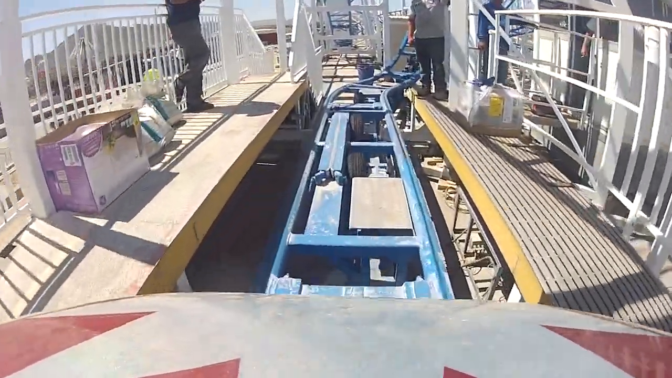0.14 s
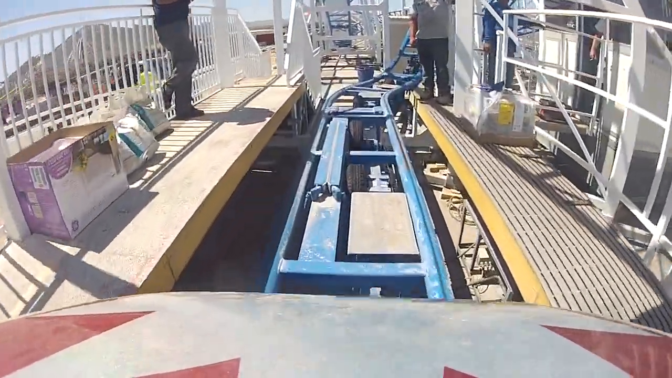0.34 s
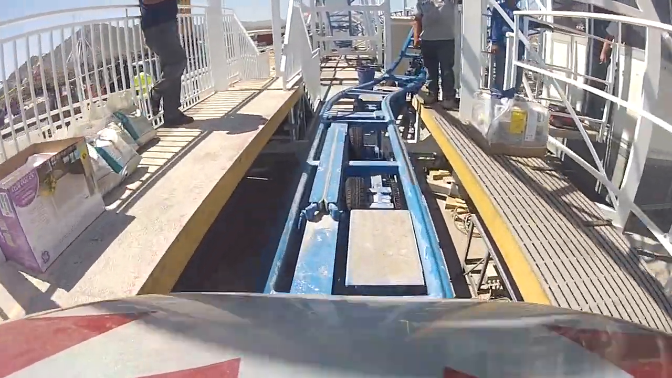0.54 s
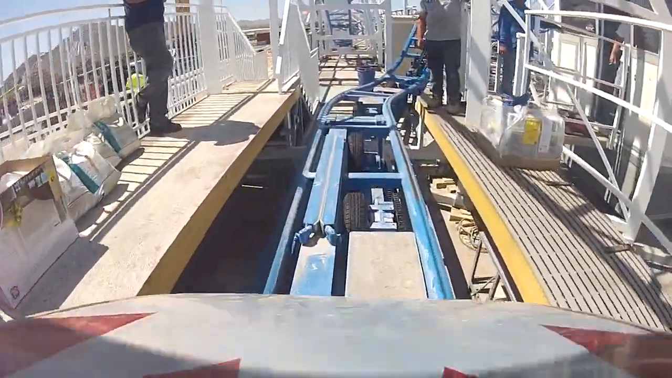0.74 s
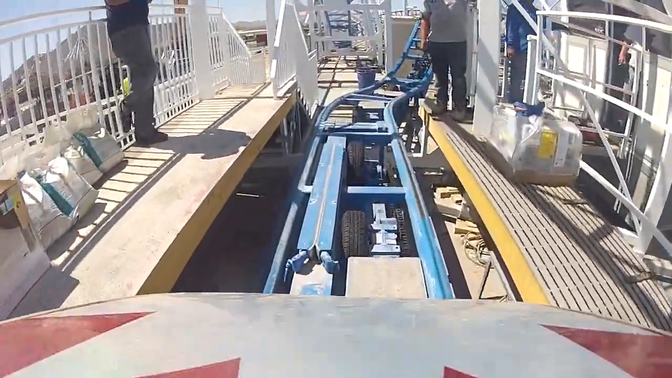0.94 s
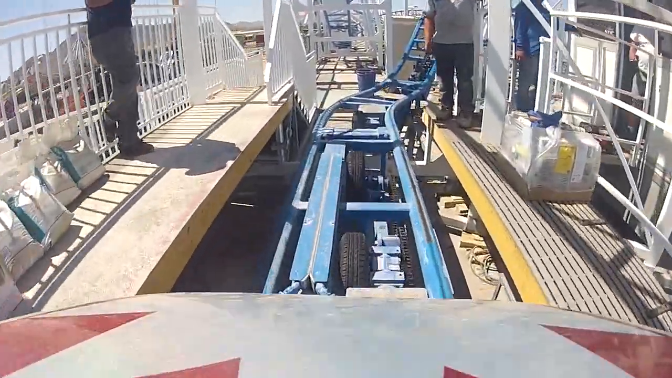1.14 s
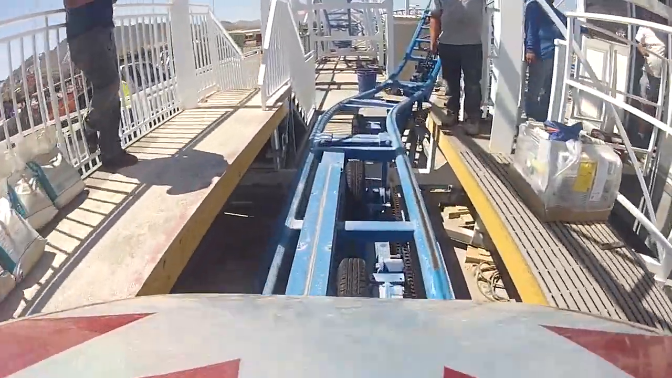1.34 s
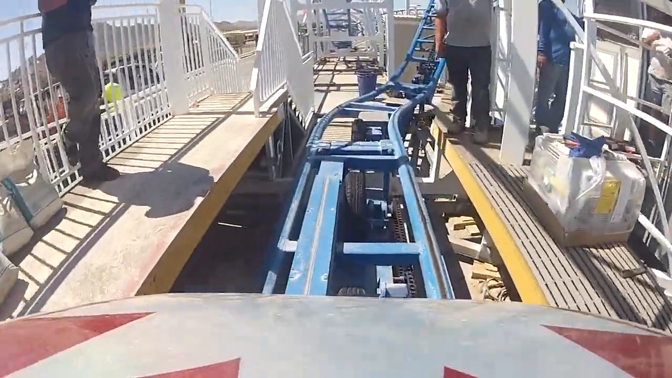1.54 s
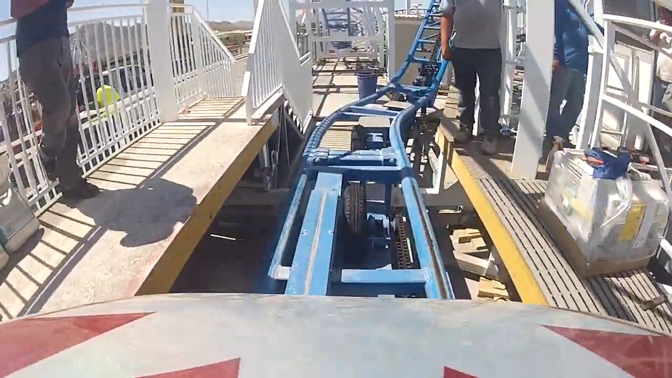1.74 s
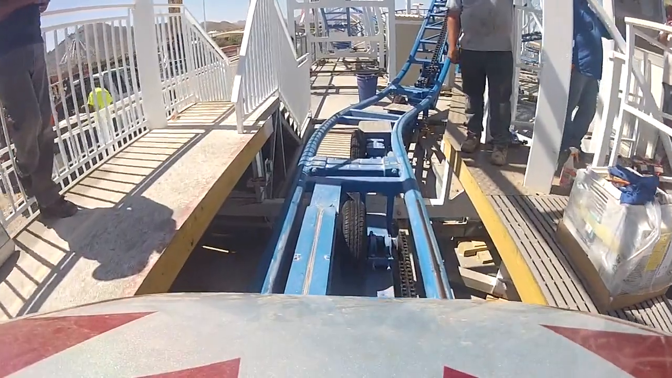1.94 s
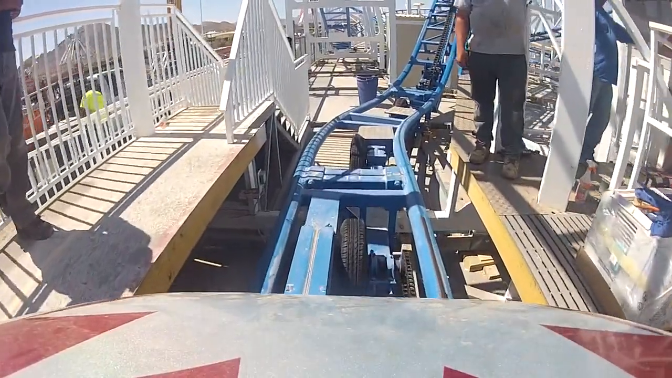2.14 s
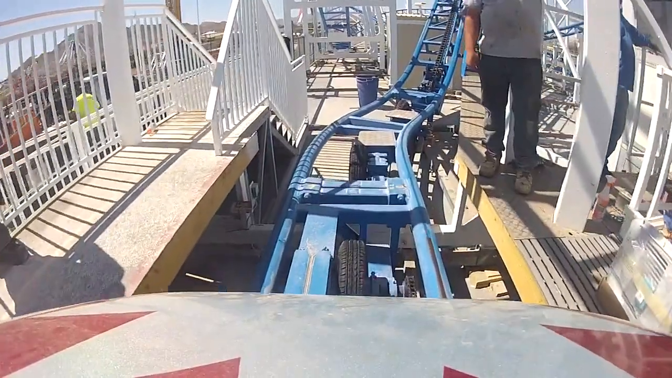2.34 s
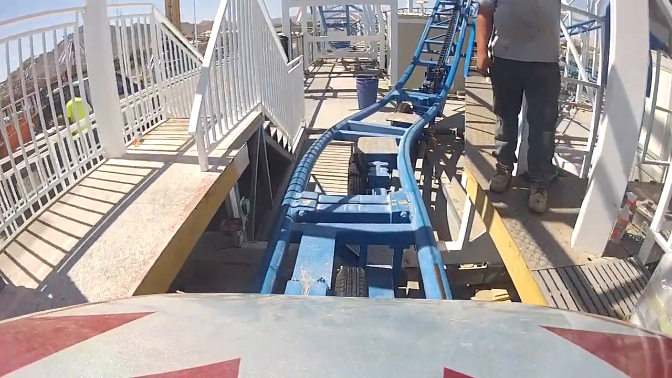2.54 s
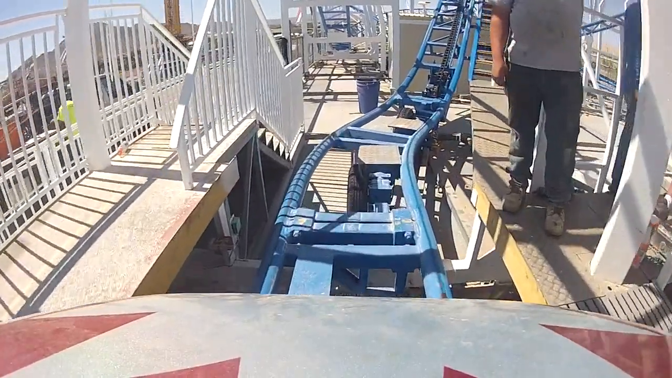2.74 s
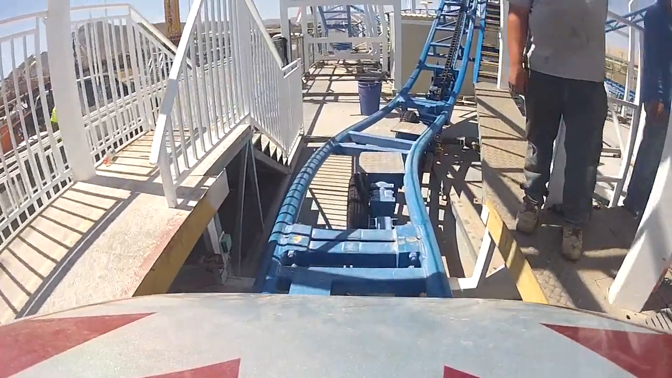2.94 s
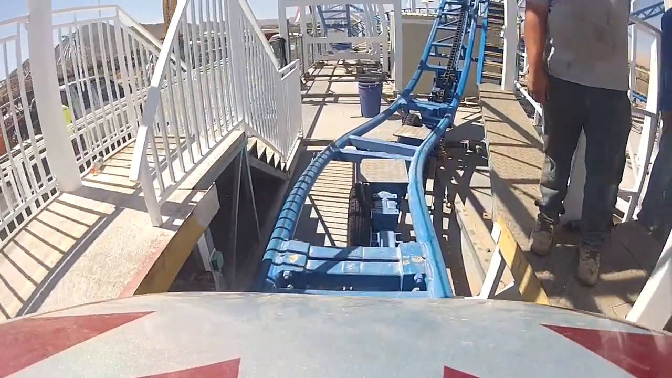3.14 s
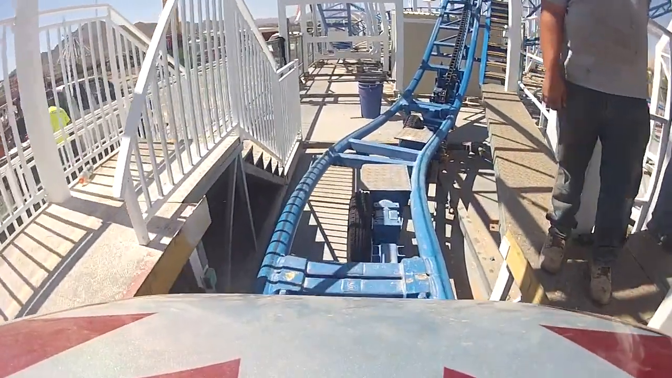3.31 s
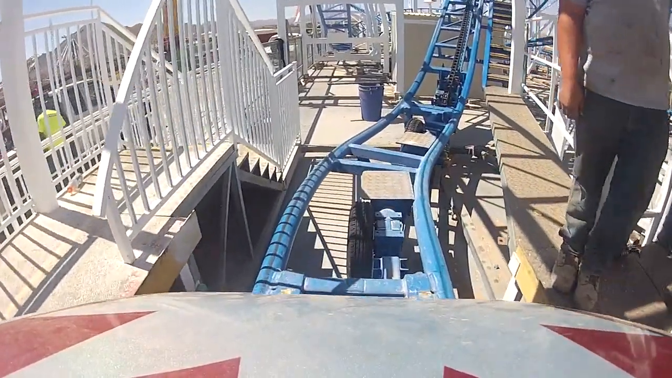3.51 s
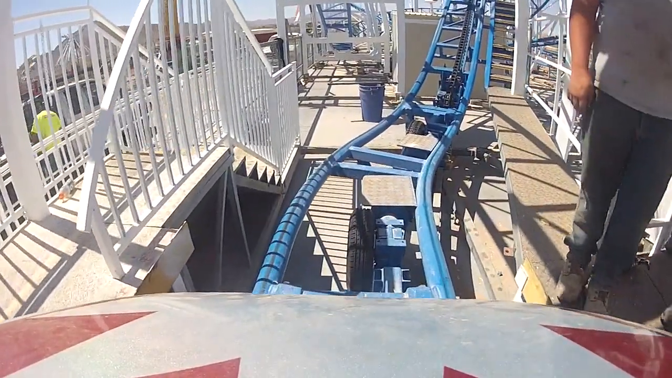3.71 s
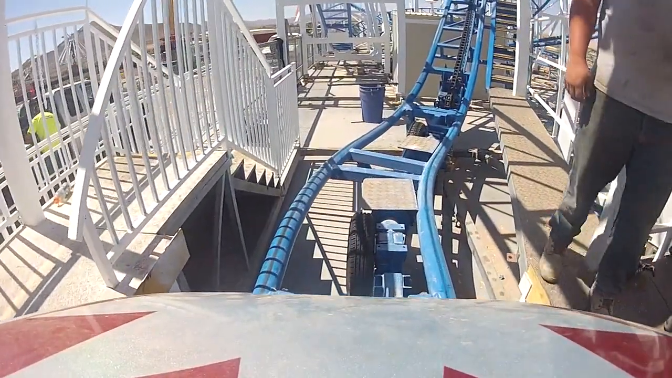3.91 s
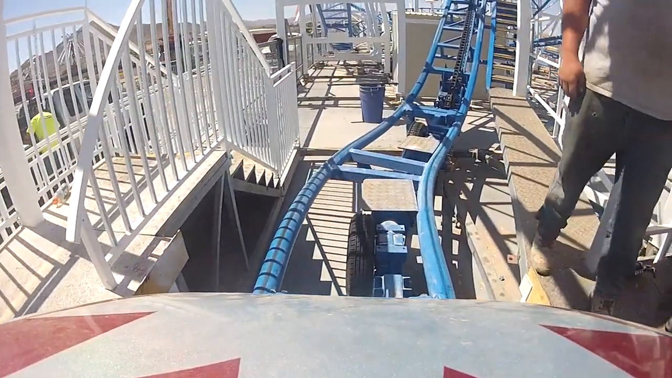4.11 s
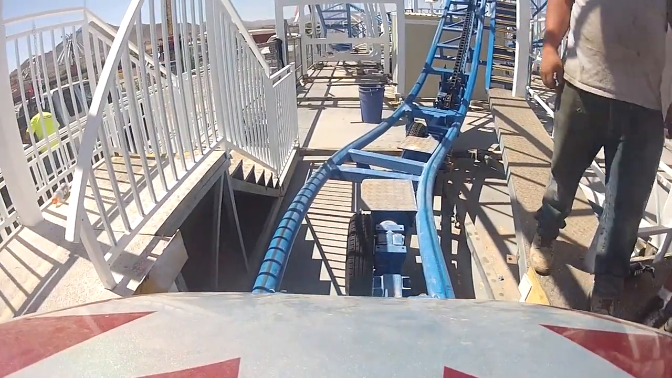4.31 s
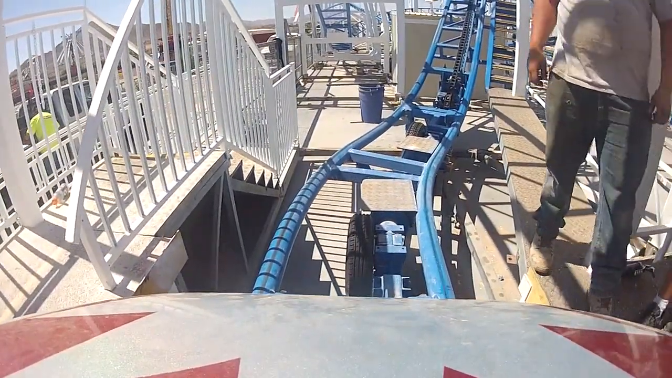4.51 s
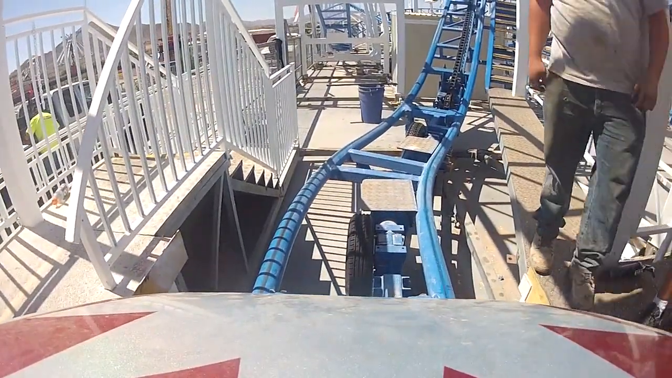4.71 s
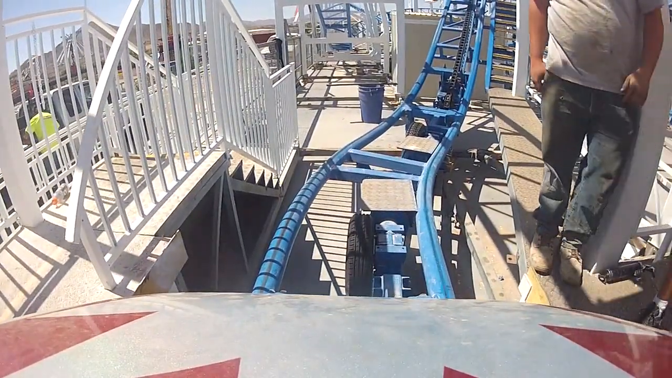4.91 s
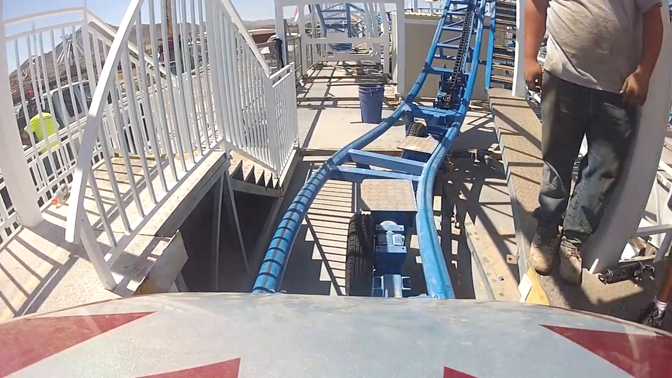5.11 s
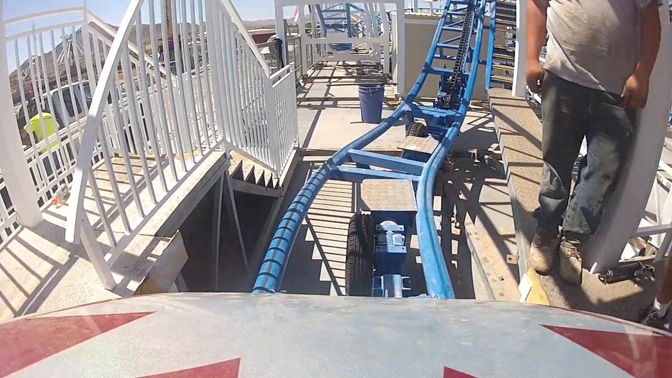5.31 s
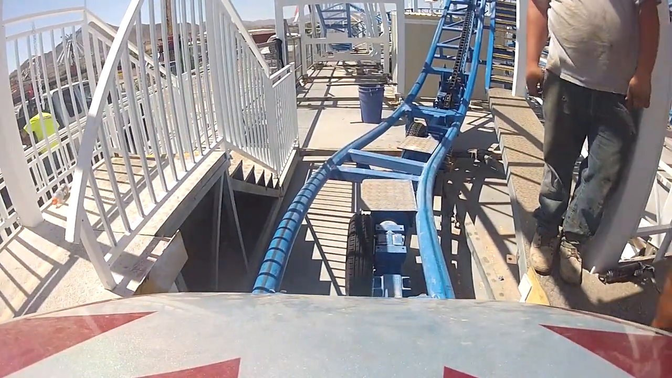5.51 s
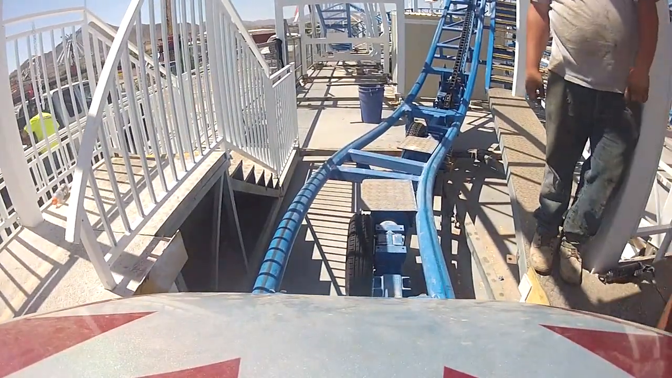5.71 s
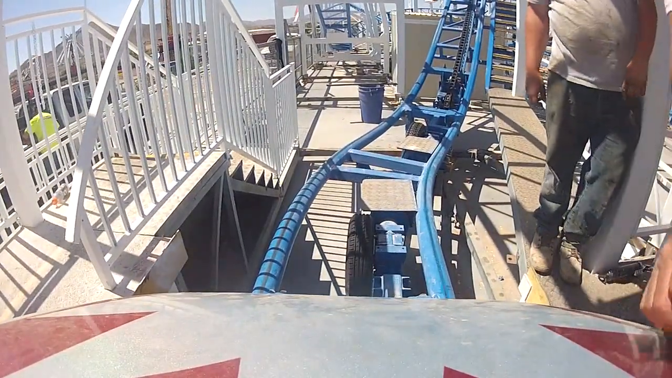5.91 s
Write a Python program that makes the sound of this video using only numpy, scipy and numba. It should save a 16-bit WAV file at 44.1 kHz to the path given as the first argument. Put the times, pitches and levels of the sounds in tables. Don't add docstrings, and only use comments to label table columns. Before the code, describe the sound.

From a sealed camera on a coaster car's nose, low rumble and dull wheel knocks over steel joints. At about two and a half seconds brake jaws clunk, then a cluster of heavy, clipped blows comes with a short pad squeal and vented air. A falling air whistle and a double clunk mark the stop; faint motor hum remains in the open-air station.

```python
import sys
import numpy as np
from scipy import signal
from scipy.fft import rfft, irfft
from scipy.io import wavfile
from scipy.ndimage import uniform_filter1d
from numba import njit

SR = 44100
rng = np.random.default_rng(int(sys.argv[2]) if len(sys.argv) > 2 else 0)


def unload_audio(sound):
    columns = np.transpose(np.atleast_2d(sound))
    steps = np.round(np.clip(columns, -1, 1) * 32767)
    wavfile.write(sys.argv[1], SR, steps.astype(np.int16))


def boost(x):
    u = np.asarray(x, float) / 20
    return 10 ** u


N = 262836


def unit_rms(x):
    return x / np.sqrt(np.mean(x ** 2))


def curves(table, rest_db=None):
    s, *columns = np.transpose(table)
    return [np.interp(np.arange(N) / SR, s, column, rest_db, rest_db) for column in columns]


@njit
def svf(x, hz, width):
    y, band, low, last, g, k = np.empty(len(x)), 0., 0., 0., 0., 0.
    for i in range(len(x)):
        if hz[i] != last:
            last, g, k = hz[i], np.tan(np.pi * hz[i] / SR), width / hz[i]
        v = (band + g * (x[i] - low)) / (1 + g * (g + k))
        band, low, y[i] = 2 * v - band, low + 2 * g * v, k * v
    return y


def steep(x, hz, width):
    x = np.pad(x, (12000, 0), "wrap")
    hz = np.pad(hz + np.zeros(N), (12000, 0), "edge")
    once = svf(x, hz, 1.195 * width)
    return svf(once, hz, 1.195 * width)[-N:]


def body(x, modes):
    out = 0
    for k, (hz, width, db) in enumerate(modes):
        out = out + (-1) ** k * boost(db) * unit_rms(steep(x, hz, width))
    return out


def steady(x, span_s):
    k = int(span_s * SR)
    power = uniform_filter1d(uniform_filter1d(x ** 2, k), k)
    return x / np.sqrt(power + 1e-9)


def walk(rate):
    k = int(SR / rate)
    held = np.repeat(rng.standard_normal(N // k + 1), k)
    return 1.3 * uniform_filter1d(uniform_filter1d(held, k), k)[:N]


def swells(rows):
    t = np.arange(N) / SR
    return sum(boost(2 * db) * np.exp(-((t - s) / half) ** 2) for s, db, half in rows)


# f/Hz, width/Hz, level/dB
HOUSING = [(604, 540, -5.5), (1047, 150, 0), (1458, 99, -8.5), (2100, 100, -0.5), (2281, 173, 4),
           (3140, 150, -4), (3326, 560, -7), (4700, 900, -43.5)]


def station_hum():
    noise = rng.standard_normal(N)
    wall = unit_rms(steep(noise, 1400.0, 2500.0))
    cavity = unit_rms(body(noise, HOUSING))
    return boost(-57.5) * unit_rms(cavity + boost(-1.5) * wall)


# f/Hz, width/Hz, level/dB
MOTORS = [(159, 31, -4.5), (280, 24, -9), (372, 37, -19)]


def station_motors():
    return boost(-57.5) * unit_rms(body(rng.standard_normal(N), MOTORS))


def wheel_song():
    start_s, end_s, hz, db = 0.86, 0.99, 1480, -66
    t = np.arange(N) / SR
    fade = np.clip(np.minimum(t - start_s, end_s - t) / 0.03, 0, 1)
    return boost(db) * fade * np.sin(2 * np.pi * hz * t)


# t/s, length/s, level/dB, low cavity level/dB, hiss level/dB
AIR = [(2.406, .05, -57.5, -20, -4), (2.425, 0.25, -43, -5, -14.5), (2.755, 0.42, -47.5, -1.5, -9.5),
       (2.937, 0.1, -52.5, 8.5, -6.5), (3.056, .05, -40, -14.5, -27), (3.087, .08, -47.5, -9, -42),
       (3.22, 0.036, -40.5, 6.5, -12), (3.295, 0.33, -59.5, 1.5, -27.5), (3.948, .08, -60.5, -17, -4),
       (3.972, 0.12, -54.5, -11, -14), (4.038, 0.045, -47.5, -12, -20), (4.074, 0.06, -48.5, -1, -17.5),
       (4.174, 0.14, -57.5, 3, -17)]


def air_flow():
    attack_share, sag_db, release_db_per_s, upper_db = 0.18, 14.5, 350.5, -8
    out = 0
    for s, length, db, low_db, hiss_db in AIR:
        t = np.maximum(np.arange(N) / SR - s, 0)
        fall_db = sag_db * t / length + release_db_per_s * np.maximum(t - length, 0)
        opening = np.minimum(t / (attack_share * length), 1)
        cavity_gain = boost(np.c_[[low_db, 0, upper_db, hiss_db]])
        out = out + opening * boost(db - fall_db) * cavity_gain
    return out


# f/Hz, width/Hz, level/dB
CAVITIES = [
    [(925, 220, 2), (1195, 160, -2), (1464, 150, 0.5), (1760, 240, -7)],
    [(2080, 220, -2.5), (2326, 310, -3)],
    [(3102, 230, 3.5), (3580, 330, -1.5)],
    [(4250, 880, 3.5), (5240, 440, 0), (5740, 440, -6)],
]


def brake_air():
    noise = rng.standard_normal(N)
    out = 0
    for flow, modes in zip(air_flow(), CAVITIES):
        flutter = boost(2 * walk(rate=70))
        out = out + flow * flutter * unit_rms(body(noise, modes))
    return boost(3.5) * out


# t/s, f/Hz, level/dB
VALVE = [
    (3.98, 2050, -52),
    (4.0, 2160, -56),
    (4.033, 2200, -30.5),
    (4.05, 1950, -46),
    (4.085, 1200, -46),
    (4.105, 850, -44.5),
    (4.115, 694, -48.5),
    (4.125, 600, -67.5),
]


def valve_whistle():
    hz = curves(VALVE)[0]
    narrow = unit_rms(steep(rng.standard_normal(N), hz, 240.))
    broad = unit_rms(steep(rng.standard_normal(N), hz, 700.))
    return boost(curves(VALVE, rest_db=-120)[1]) * unit_rms(narrow + 0.36 * broad)


# t/s, peak level/dB
TICKS = [
    (3.6224, -38.5),
    (4.2098, -41),
]


def settling_ticks():
    t = np.arange(N) / SR
    puff = sum((t > s) * boost(db - 5.5) * np.exp(-np.abs(t - s) / 0.00061) for s, db in TICKS)
    return puff * unit_rms(steep(rng.standard_normal(N), 4200., 3500.))


# t/s, f/Hz, level/dB, octave level/dB, roughness/0-1
SQUEAL = [
    (2.775, 2080, -57.5, -72.5, .7),
    (2.795, 2006, -37.5, -50, 0.7),
    (2.825, 1920, -39.5, -46.5, 0.45),
    (2.85, 1945, -42, -47.5, .6),
    (2.858, 2093, -37.5, -46.5, 0.2),
    (2.89, 2066, -31, -44.5, 0.03),
    (2.93, 2070, -40.5, -44.5, 0.2),
    (2.955, 1990, -44, -46.5, 0.7),
    (2.99, 2080, -64.5, -55.5, 0.3),
]


def pad_squeal():
    hz, _, _, rough = curves(SQUEAL)
    _, db, octave_db, _ = curves(SQUEAL, rest_db=-120)
    waver = unit_rms(uniform_filter1d(rng.standard_normal(N), size=200))
    phase = 2 * np.pi * np.cumsum(hz + 40 * rough * waver + 5 * waver) / SR
    noise = rng.standard_normal(N)
    out = 0
    for k, level_db, width in ((1, db, 89.0), (2, octave_db, 370.0)):
        smear = unit_rms(steep(noise, k * hz, width))
        share = np.clip(k * rough, 0, 1)
        haze = (k - 1) * boost(2 * -5)
        tone = np.sqrt(2 - 2 * share) * np.sin(k * phase)
        out = out + boost(level_db) * (tone + np.sqrt(share + haze) * smear)
    return out


def rail_jolts(rate, scatter_db):
    hit = rng.random(N) < rate / SR
    return hit * rng.standard_normal(N) * boost(scatter_db * rng.exponential(size=N))


# t/s, shake level/dB
SHAKE = [(0.0, -33), (0.5, -27.5), (1.3, -30), (1.8, -27.5), (2.3, -29), (2.765, -28.5), (2.82, -14.5),
         (2.96, -24.5), (3.14, -22), (3.3, -24), (3.56, -34.5), (3.85, -33.5), (4.14, -35.5), (4.22, -29),
         (4.42, -31.5), (4.58, -42), (5.3, -42.5), (5.96, -41)]


def wheel_shake():
    return curves(SHAKE)[0] + 29.5


# f/Hz, width/Hz, level/dB
SWAY = [
    (23, 2.7, 2),
    (35.5, 8, -16.5),
]
# t/s, level/dB, half length/s
LURCHES = [(0.052, -20.5, 0.067), (0.27, -21, 0.077), (0.5, -19.5, .05), (0.73, -16, .08),
           (1.234, -25.5, 0.081), (1.42, -19.5, 0.086), (1.62, -29, 0.042), (1.804, -16.5, 0.056),
           (2.05, -28.5, 0.27), (2.529, -17, .07), (2.87, -14, 0.077), (3.05, -27, .05), (3.24, -24, .05),
           (3.41, -19, 0.036), (3.58, -24, 0.088), (3.9, -34.5, 0.17), (4.27, -23.5, .07), (4.49, -23, 0.1),
           (4.75, -37.5, 0.15), (4.98, -37.5, .1), (5.18, -43.5, 0.043)]


def mount_sway(jolts, shake):
    level = np.sqrt(boost(2 * (-39.5 + 1 * shake)) + swells(LURCHES))
    t = np.arange(N) / SR
    first_swing = 0.21 * np.exp(-t / 0.008) * np.cos(2 * np.pi * SWAY[0][0] * t)
    return level * steady(body(jolts, SWAY), 0.085) + first_swing


# f/Hz, width/Hz, level/dB
SHUDDER = [
    (53, 4.8, 0),
]
# t/s, level/dB, half length/s
KICKS = [
    (1.033, -25, 0.03),
    (1.384, -33.5, .06),
    (2.009, -37, 0.26),
    (2.49, -29, .06),
    (2.853, -23, .04),
    (3.023, -18.5, 0.03),
    (3.231, -18, 0.022),
    (3.5, -35.5, 0.046),
    (4.231, -43, .06),
    (5.286, -70, 0.11),
]


def mount_shudder(jolts, shake):
    level = np.sqrt(boost(2 * (-42 + 1.2 * shake)) + swells(KICKS))
    return level * steady(body(jolts, SHUDDER), 0.13)


def part_level(shake, blown, db, slope, blow_db, uneven_db, more=0):
    rolling_power = boost(2 * (db + slope * shake + uneven_db * walk(rate=14)))
    return np.sqrt(rolling_power + boost(2 * blow_db) * blown + more)


# f/Hz, width/Hz, level/dB
FRAME = [
    (108, 17, -3),
    (123.45, 19, -6.5),
]
# t/s, level/dB, half length/s
SWELLS = [(0.04, -23.5, 0.017), (0.24, -30, 0.15), (0.41, -21, 0.026), (0.5, -26.5, 0.02),
          (0.63, -16.5, 0.013), (0.675, -11.5, 0.027), (0.745, -12.5, 0.013), (0.905, -17, 0.046),
          (1.0, -25, 0.021), (1.08, -22, 0.013), (1.15, -17, 0.043), (1.52, -24.5, 0.031),
          (1.89, -22.5, 0.026), (1.97, -21.5, 0.017), (2.17, -16.5, 0.01), (2.35, -24.5, 0.016),
          (2.7, -27, 0.01), (3.04, -8.5, 0.024), (3.19, -15, 0.019), (3.28, -15.5, 0.018),
          (3.33, -14.5, 0.025), (3.42, -24.5, .025), (3.67, -28.5, .04), (3.88, -27.5, 0.02),
          (4.0, -29.5, 0.034), (4.235, -11, 0.019), (4.36, -44, 0.034), (4.43, -30.5, 0.034)]


def frame_boom(jolts, shake, blown):
    level = part_level(shake, blown, db=-28, slope=1.3, blow_db=-30, uneven_db=3, more=swells(SWELLS))
    return level * steady(body(jolts, FRAME), 0.034)


# f/Hz, width/Hz, level/dB
PANELS = [
    (156.05, 16.6, -2.5),
    (184.9, 28.3, -1),
]


def panel_drone(jolts, shake, blown):
    level = part_level(shake, blown, db=-33.5, slope=1.3342, blow_db=16.5, uneven_db=1.5)
    return level * steady(body(jolts, PANELS), 0.06)


# f/Hz, width/Hz, level/dB
SEATS = [
    (222.5, 33, -0.5),
    (259.2, 40, 0),
]


def seat_drone(jolts, shake, blown):
    level = part_level(shake, blown, db=-46, slope=1.35, blow_db=11.5, uneven_db=1.7)
    return level * steady(body(jolts, SEATS), 0.06)


# f/Hz, width/Hz, level/dB
RATTLE = [(332.5, 28, 7.5), (433, 190, -5.5), (527, 81, -4), (613, 55, -4), (710, 240, -12), (938, 82, -8)]


def loose_rattle(shake, blown):
    level = part_level(shake, blown, db=-58.5, slope=0.27, blow_db=0, uneven_db=0.6)
    return level * steady(body(rng.standard_normal(N), RATTLE), 0.029)


def after_shake():
    peak_s, rise_s, fall_s, hardest_db = 0.0075, 0.022, 0.034, -37
    out, t = np.zeros(N + SR), np.arange(-.1 * SR, .2 * SR) / SR
    late = t - peak_s
    shape = np.exp(-2 * np.where(late < 0, (late / rise_s) ** 2, late / fall_s))
    for s, _, _, blow_db, _ in JOINTS + JAWS:
        i = int((s + t[0]) * SR)
        out[i:i + len(t)] += boost(2 * min(blow_db, hardest_db)) * shape
    return out[:N]


def rolling():
    shake, blown = wheel_shake(), after_shake()
    jolts = rail_jolts(rate=340, scatter_db=2.5)
    mount = mount_sway(jolts, shake) + mount_shudder(jolts, shake)
    car = frame_boom(jolts, shake, blown) + panel_drone(jolts, shake, blown) + seat_drone(jolts, shake, blown)
    return mount + car + loose_rattle(shake, blown)


# f/Hz, width/Hz, level/dB
CLANK = [
    [(324, 36, 4.5), (399, 65, 4.5), (553, 65, -8), (750, 26, -6)],
    [(998, 96, 0), (1191, 22, 0), (1299, 41, -4.5), (1470, 180, -16.5), (1740, 170, -10.5), (2090, 53, 1.5)],
]
# t/s, ring peak level/dB, ring f/Hz, blow level/dB, bright clank level/dB
JOINTS = [(0.283, -40, 102, -57, -69), (0.401, -29, 108.4, -57, -62), (0.674, -28, 110, -46, -53.5),
          (0.708, -16.5, 135, -46, -45.5), (0.883, -3, 109.2, -56, -68), (1.383, -26, 119, -46.5, -51),
          (1.406, -7.5, 119.7, -58, -54), (1.443, -12, 137, -47, -58), (1.532, -23, 108, -46, -50.5),
          (1.76, -22, 110, -50.5, -49), (1.772, -10.5, 114, -40.5, -53), (1.907, -16.5, 102, -53, -52.5),
          (1.964, -23, 167, -62, -57)]
JAWS = [(2.487, -3.5, 130.5, -34.5, -37.5), (2.813, -16, 170, -31.5, -35), (2.849, 2, 115, -41.5, -49.5),
        (2.885, 1, 115.6, -39.5, -38), (2.995, -22, 151, -22.5, -46), (3.007, 9.5, 131, -28, -36.5),
        (3.016, -9.5, 138.4, -32.5, -41.5), (3.052, -8, 129.5, -38.5, -42), (3.12, -13, 148, -46, -53.5),
        (3.162, -14, 170.5, -39.5, -48), (3.22, 6.5, 193, -31.5, -41.5), (3.227, -15, 149.7, -11, -27.5),
        (3.2352, 4, 118.3, -32, -42), (3.273, -10, 117, -42.5, -48), (3.331, -28, 125, -47, -51),
        (3.406, -11, 117.3, -54, -47), (4.189, 0, 146, -39.5, -45), (4.201, 5, 154, -33.5, -42),
        (4.241, -18, 103, -46, -51), (4.841, -16, 166.5, -56, -60), (4.913, -23, 125, -63, -84),
        (5.069, -29, 108, -61, -70)]
LAST_RING = (4.262, -8.5, 163.5, -74, -77.5)


def blows():
    ring, clank = np.zeros(N), np.zeros((2, N))
    t = np.arange(int(.6 * SR)) / SR
    sag = t + .25 * .01 * (1 - np.exp(-t / 0.014))
    early = 1000
    clank_shape = np.exp(-((t - early / SR - 0.008) / 0.0052) ** 2)
    for row in JOINTS + JAWS + [LAST_RING]:
        s, db, hz, *clank_db = row
        i = int(s * SR)
        t60 = 0.47 if row is LAST_RING else 14.2 / hz
        shape = (1 - np.exp(-(t / .005) ** 2)) * boost(-60 * t / t60)
        ring[i:i + len(t)] += boost(db - 6) * shape / shape.max() * np.sin(2 * np.pi * hz * sag)
        clank[:, i - early:i - early + len(t)] += boost(np.c_[clank_db]) * clank_shape
    noise = rng.standard_normal(N)
    clanks = sum(force * steady(body(noise, modes), 0.0033) for force, modes in zip(clank, CLANK))
    return ring + boost(-2.0) * clanks


def scene():
    station = station_hum() + station_motors()
    brakes = brake_air() + valve_whistle() + pad_squeal()
    mono = station + brakes + wheel_song() + settling_ticks() + rolling() + blows()
    return np.array([mono, mono])


def band_limit(x):
    return signal.sosfilt(signal.butter(12, 15520, fs=SR, output="sos"), x)


def record(dry):
    hold_hz, mirror_db, left_lag_s = 12000, 0, 2.35e-5
    slow = signal.resample_poly(dry[0], 40, 147, padtype="edge")
    held = signal.resample_poly(np.repeat(slow, 4), 147, 160, padtype="edge")
    held = np.pad(held, (999, 1999), "edge")[:N + 2000]
    hz = np.fft.rfftfreq(len(held), 1 / SR)
    mirror = np.where(hz > hold_hz / 2, boost(mirror_db), 1)
    lag = np.exp(-2j * np.pi * hz * np.array([[left_lag_s], [0]]))
    both = irfft(rfft(held) * mirror * lag, len(held))[:, 999:999 + N]
    return band_limit(np.clip(both, -1, 1))


dry = scene()
out = record(dry)
unload_audio(out)
```